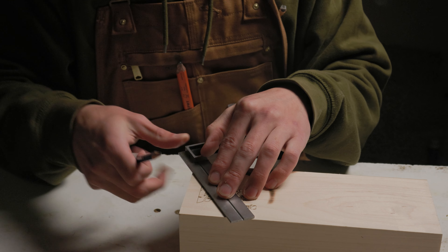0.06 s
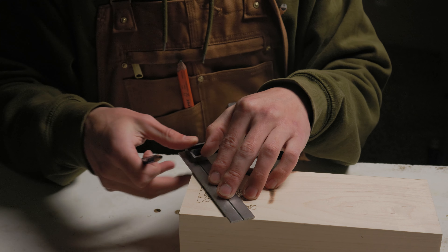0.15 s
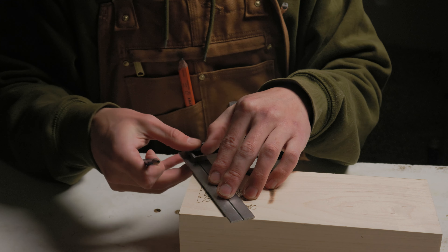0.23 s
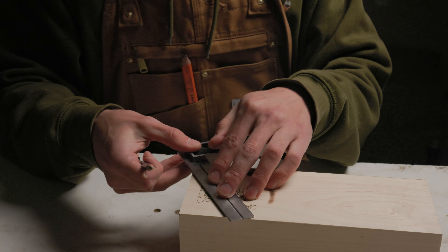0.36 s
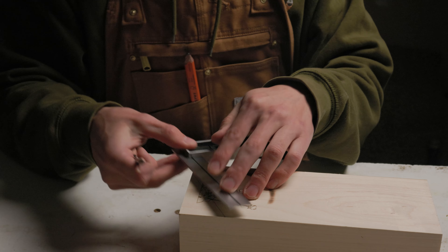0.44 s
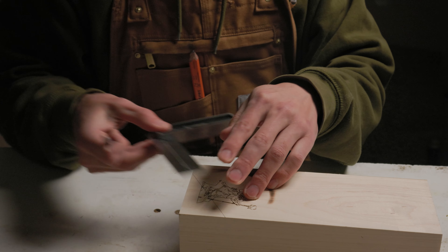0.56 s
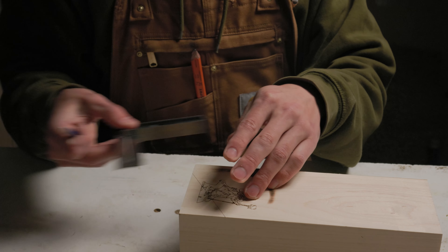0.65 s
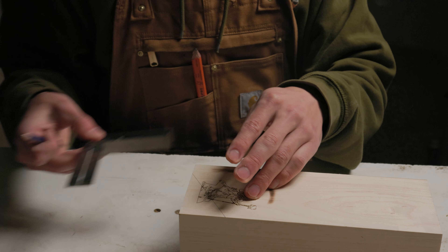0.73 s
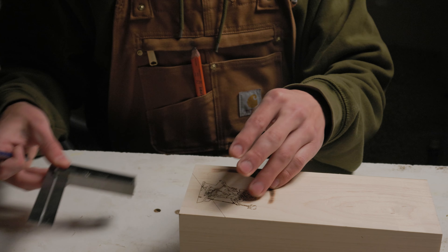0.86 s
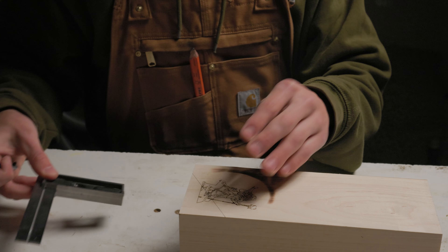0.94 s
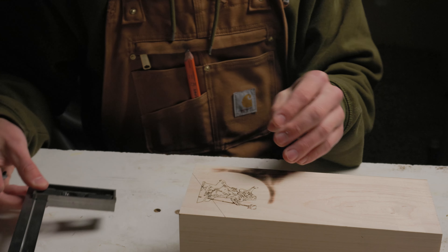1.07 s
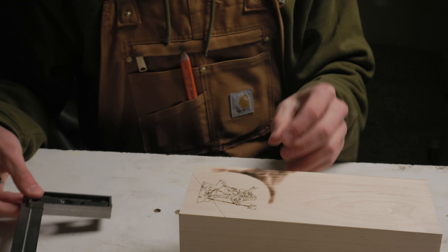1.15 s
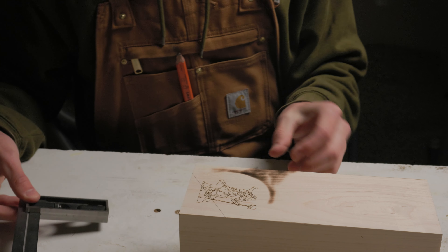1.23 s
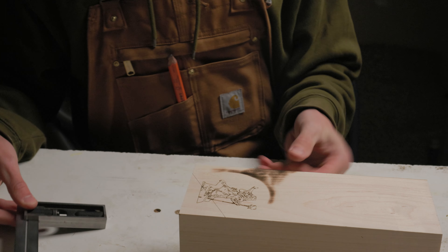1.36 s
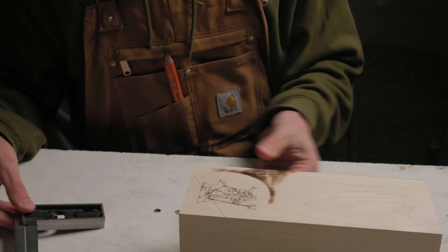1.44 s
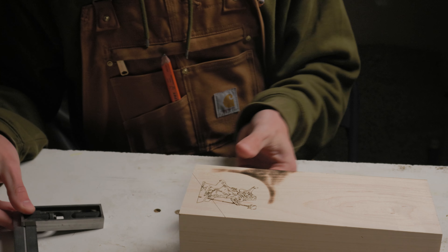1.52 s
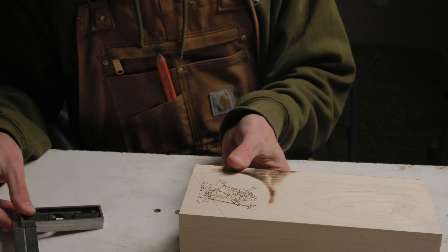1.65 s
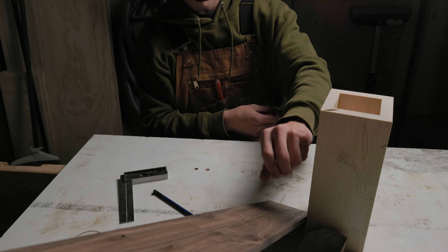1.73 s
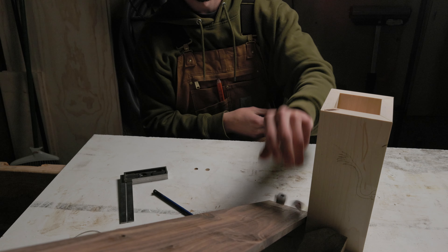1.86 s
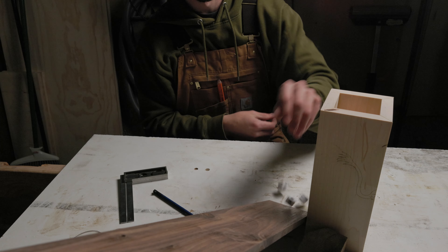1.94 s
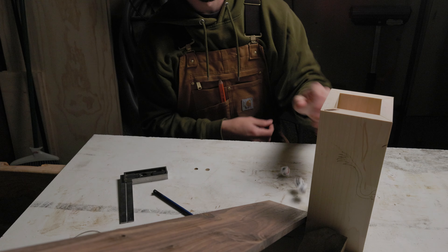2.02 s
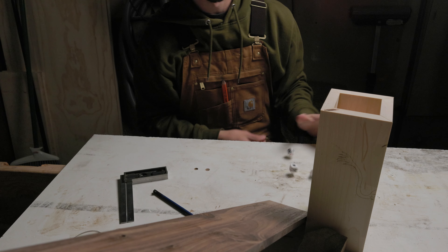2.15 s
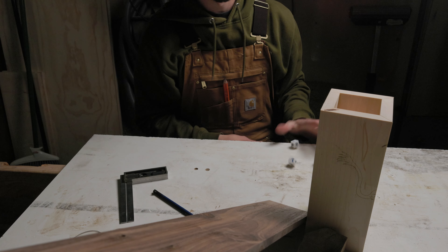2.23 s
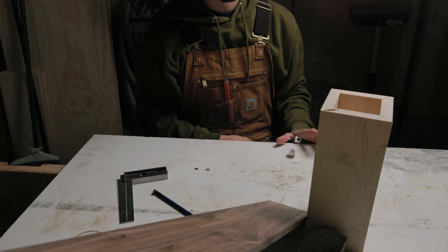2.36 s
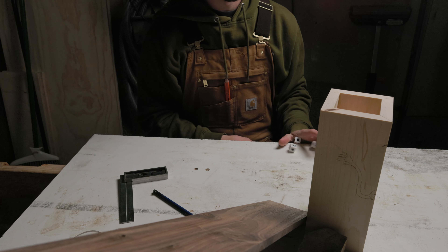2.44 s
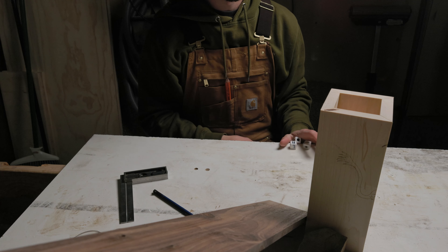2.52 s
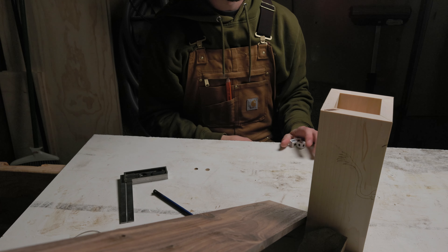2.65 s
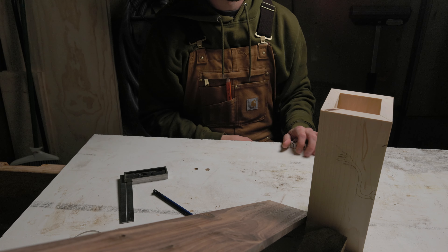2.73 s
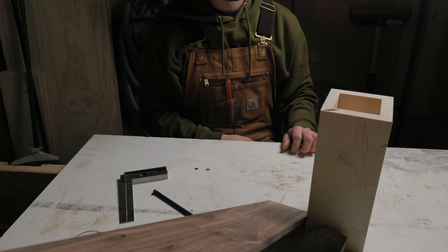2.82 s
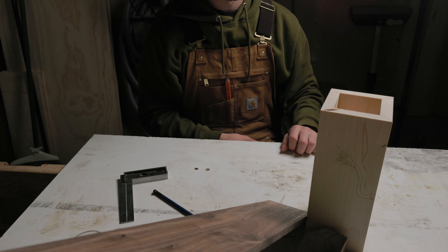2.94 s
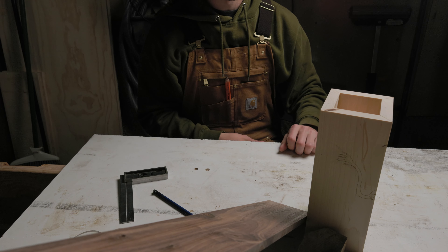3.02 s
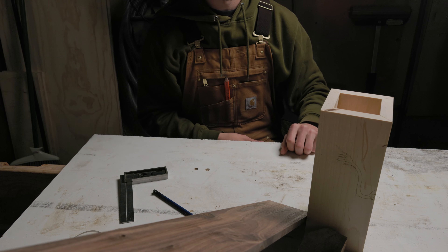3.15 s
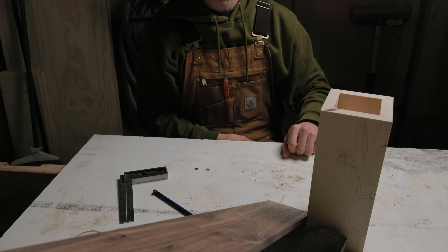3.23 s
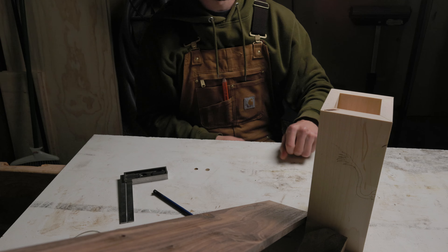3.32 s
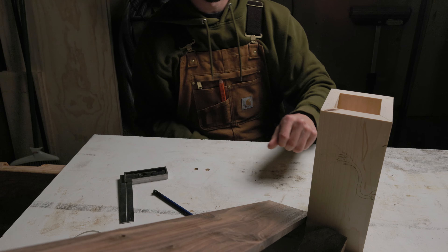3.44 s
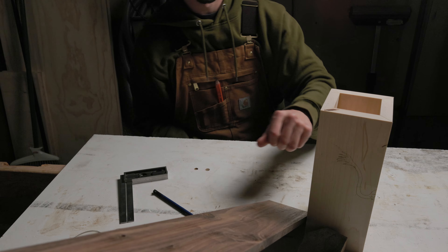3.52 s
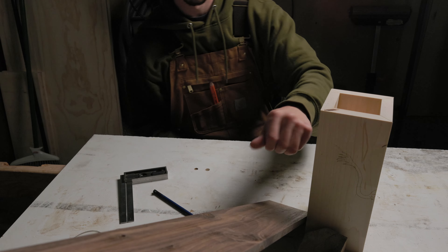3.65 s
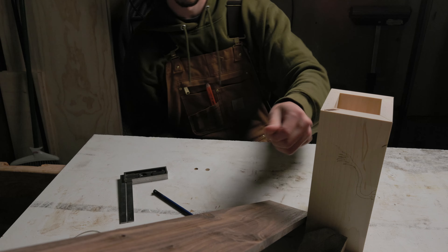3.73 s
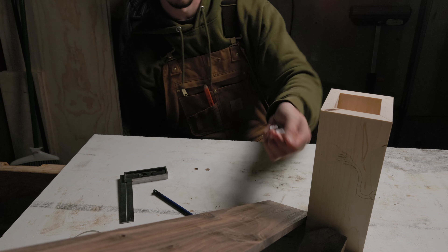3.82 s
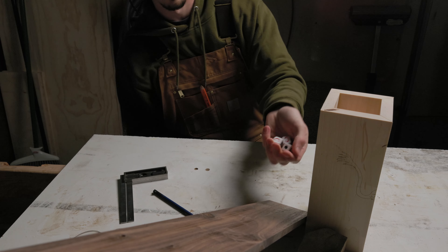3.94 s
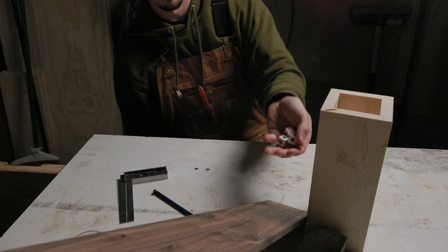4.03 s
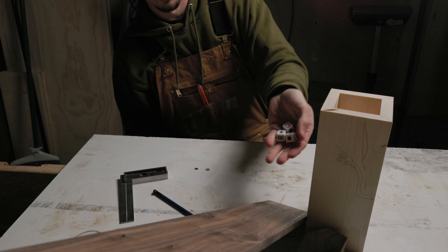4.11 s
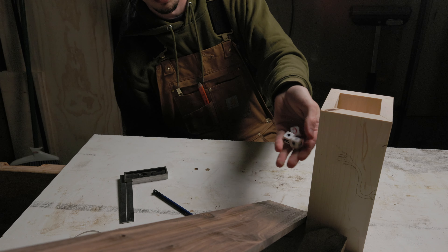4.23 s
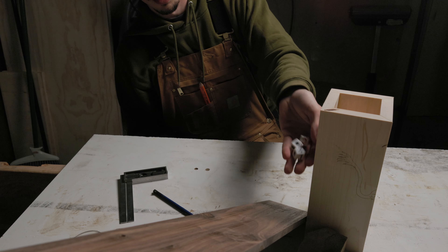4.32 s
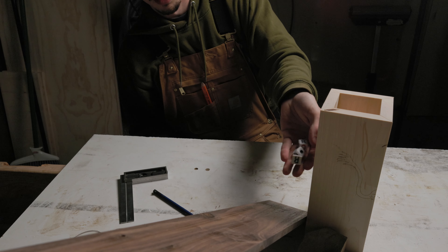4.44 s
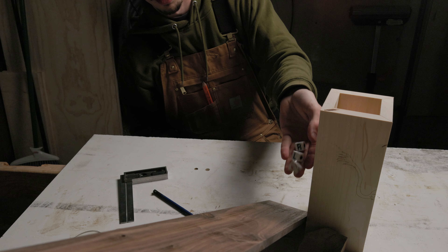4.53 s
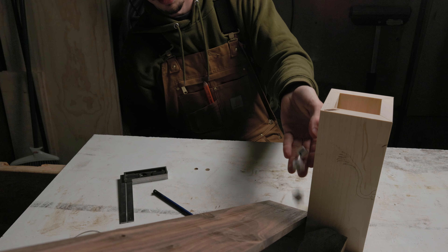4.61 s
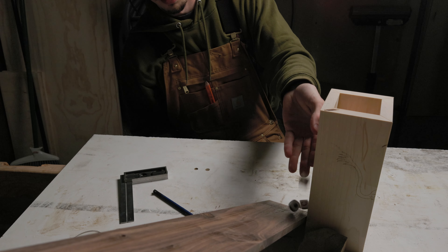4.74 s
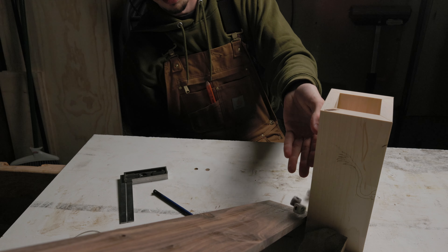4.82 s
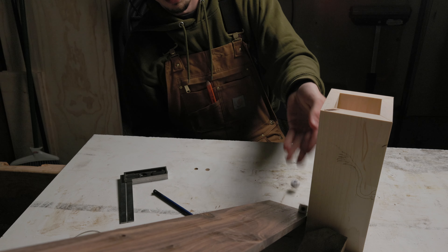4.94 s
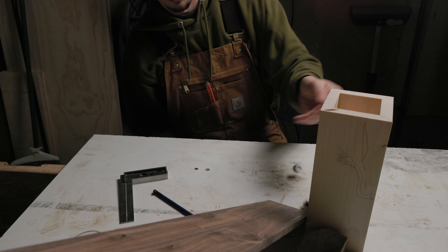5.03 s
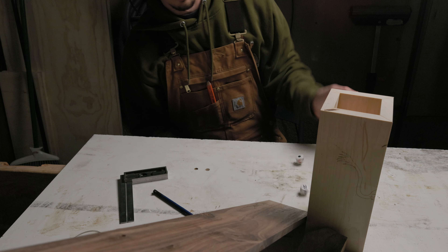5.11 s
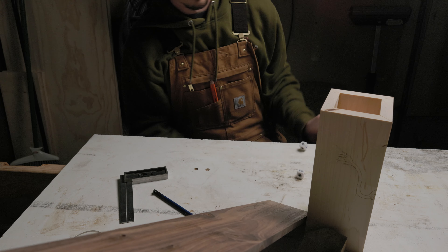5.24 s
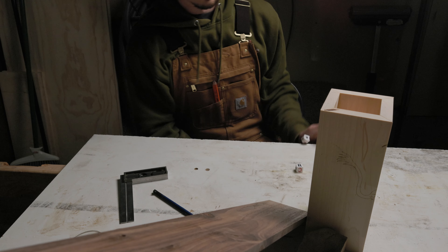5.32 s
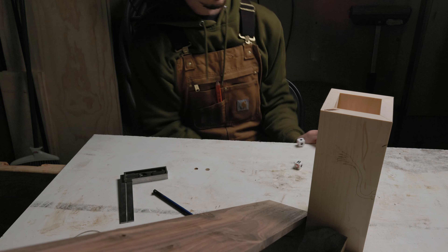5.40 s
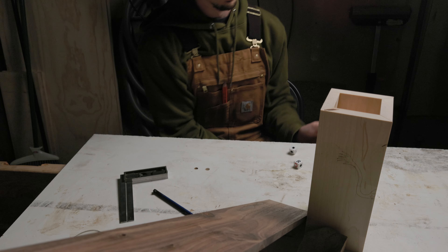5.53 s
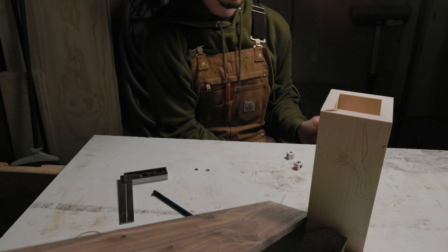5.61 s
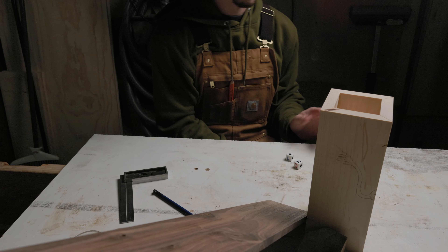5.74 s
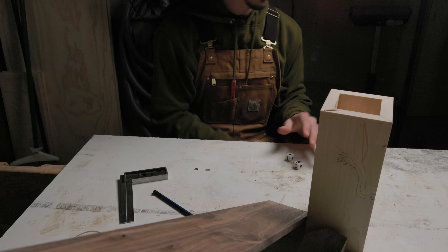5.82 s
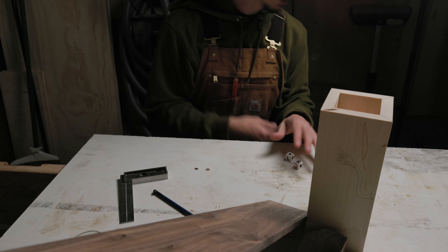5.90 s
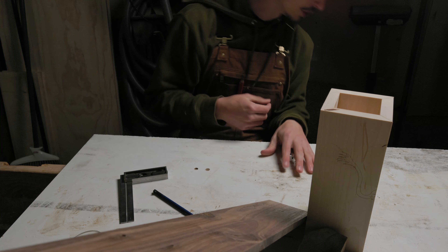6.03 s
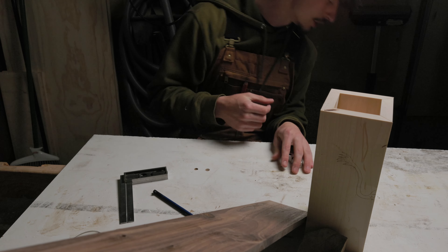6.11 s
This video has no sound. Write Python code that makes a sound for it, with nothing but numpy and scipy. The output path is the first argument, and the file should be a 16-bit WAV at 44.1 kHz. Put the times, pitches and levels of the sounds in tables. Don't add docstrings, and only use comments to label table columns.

```python
import sys
import numpy as np
from scipy import signal
from scipy.fft import rfft, irfft, next_fast_len
from scipy.io import wavfile

SR = 44100
rng = np.random.default_rng(int(sys.argv[2]) if len(sys.argv) > 2 else 0)


def unload_wav(signal):
    wavfile.write(
        sys.argv[1],
        SR,
        np.round(np.clip(np.atleast_2d(signal).T, -1, 1) * 32767).astype(np.int16),
    )


def boost_factor(decibels):
    exponent = np.asarray(decibels, float) / 20
    return 10 ** exponent


N = 272035

# start in seconds, peak in dB, table knock in
# dB, die click in dB, favoured pitch in Hz.
LANDINGS = [
    (1.9472, -3.5, -11.5, -41.5, 2900),
    (1.957, -2, -13.5, -38, 2527),
    (1.9684, -32, -17.5, -8.5, 1806),
    (1.9887, -11, -9, -24, 2430),
    (1.9932, -9.5, -20.5, -25, 3764),
    (2.0015, -8, -15, -24.5, 1840),
    (2.0195, -14.5, -12.5, -25, 1840),
            (4.7643, -3, -12, -22, 3100), (4.7898, -19.5, -8, -30.5, 3730),
                   (4.822, -41.5, -3, -1.5, 3710), (4.83, -7, -16.5, -17.5, 3230),
                   (4.8362, -15, -6, -7, 3039), (4.852, -3, -15, -30, 2800),
                   (4.8959, -10.5, -10.5, -24, 3400), (4.9073, -9, -13, -21, 3200),
                   (4.9196, -16.5, -8.5, -29.5, 3800), (4.9354, -8, -13, -30.5, 3270),
                   (4.9436, -9, -14, -14.5, 2080), (4.96, -16, -12, -16, 3160),
                   (4.984, -23.5, -8.5, -23, 2470)]
BOUNCES = [(2.0542, -21.5, -26, -5, 3210), (2.0596, -13, -10, -15, 3470),
           (2.064, -16, -15, -27, 2540), (2.1149, -18.5, -13, -12.5, 2800),
           (2.126, -21, -11, -31, 2800), (2.1329, -23.5, -4, -18, 2650),
           (2.1697, -22.5, -4.5, -3.5, 2830), (2.1755, -28, -21, -22, 2750),
           (2.2282, -23.5, -17, -1, 3750), (2.2348, -23, 0, -13, 2930), (2.2414, -19, -31, -11, 3240),
           (2.2538, -30, -22, -24, 2280), (2.2766, -33, -8, -20, 2750),
           (2.2986, -24.5, -4, -10, 3200), (2.3123, -27, -10, -20, 3100),
           (2.3191, -30, -17, -0.5, 2990), (2.3234, -22, -10, -28, 3100),
           (2.3279, -22, -23.5, -7.5, 3400), (2.3748, -24.5, -6, -16, 2870),
           (2.39, -22.5, -19, -12, 3200), (2.4241, -20, -20, -2.5, 3400),
           (2.481, -29.5, -16, -14, 2862), (2.503, -39, -9, -19, 2410), (2.536, -37, -15, -13, 2890),
                  (2.54, -28, -17, -15, 3360), (2.5683, -32, -13, -18, 3200), (2.5967, -37, 1, 4, 2890),
                  (2.6105, -28, -5.5, -4, 3180), (2.6398, -32.5, -0.5, -4, 2930),
                  (2.647, -35, -12, -6, 2750), (2.6529, -33.5, -3, -1.5, 2400),
                  (2.674, -34, -14, -15, 2480), (2.6803, -32, -7, -9, 2590), (2.6894, -38, 1, -6, 2260),
                  (2.704, -32.5, -1.5, -7, 2540), (2.7262, -36.5, 1.5, -6, 2580),
                  (2.7552, -43, -12, -5, 2360), (2.7896, -41, -11, -8, 2840), (2.7973, -44, -6, -2, 2880),
                  (2.8097, -36.5, -1, -8, 2360), (2.82, -41, -13, -4, 2390), (2.829, -41, -9, -7, 2680),
                  (2.837, -39, -1, -3, 2300),
           (5.0052, -17, -19, -2.5, 3100), (5.0111, -13.5, -20, -21, 2970),
                  (5.0826, -20.5, -11, -13.5, 3150), (5.0969, -18.5, -8, -22, 3699),
                  (5.1392, -22.5, -17, -18, 3230), (5.1462, -20.5, -10, -20, 3320),
                  (5.154, -23.5, -4, -21, 2300), (5.1765, -32, -14, -11, 2370),
                  (5.193, -16.5, -8, -3.5, 3261), (5.1976, -30, -5, -24, 2750),
                  (5.2105, -34, -10, -9, 3070), (5.2172, -26, -5, -21, 3240), (5.238, -23, -5.5, -19, 3330),
                  (5.2557, -25, -8, -15, 2960), (5.269, -28.5, -18, -8, 3170),
                  (5.3099, -17.5, -13.5, -16, 3330), (5.3235, -23.5, -13, -6, 3200),
                  (5.3327, -26, -13, -3.5, 3620),
           (5.3761, -36, 5, -10, 2800), (5.4053, -33, 0, -14, 2740), (5.4351, -27, 0, -18, 2800),
                   (5.5097, -28.5, 1, -17, 2800), (5.52, -29, 1, -17, 3030), (5.551, -37, 2, -30, 1980),
                   (5.5645, -38.5, 5.5, -7, 2990), (5.579, -35.5, 3, 2.5, 3420), (5.591, -32, -7, -7, 3140),
                   (5.598, -40, 7, -19, 2470), (5.604, -41, -11, -21, 1830), (5.6196, -36, -10, -23, 3210),
                   (5.6315, -44.5, -15, -25, 2760), (5.6488, -52, -14, -27, 2810),
                   (5.6595, -35, -19, -21, 3250), (5.6771, -31.5, -19, -4, 3480),
                   (5.681, -32, -15, -14, 3340), (5.7125, -35, -1, -9, 2220), (5.7203, -29, 3, -6.5, 2970),
                   (5.7728, -41, 4, -1, 1974),
           (2.2321, -18.5, -11, -30, 3080), (2.4352, -28.5, 0, -12, 2800), (2.63, -41, -7, -10, 2600),
                 (2.6709, -32, -5, -15, 2500), (2.747, -45.5, 5, -20, 2300), (2.7844, -58, -12, -5, 2800),
                 (2.846, -38.5, 4.5, -20, 2990), (5.0027, -22, -16, -18, 3200), (5.033, -35, -3, 1, 2902),
                 (5.044, -32, -15, -8, 2570), (5.13, -30, -13, -18, 2610), (5.26, -34, -6, -10, 2420),
                 (5.361, -40, -4, -13, 2300), (5.456, -34, -1, -24, 1989), (5.527, -34, 0, -31, 2201),
                 (5.7412, -33, 9, -27, 2220), (5.757, -31, 3, -35, 1500), (5.707, -36.5, 8, -35, 1300)]
# pitch in Hz, level in dB, t60 in seconds.
BOARD_MODES = [(1577, -12, 0.053), (1840, -0.5, 0.079), (2000, -6.5, 0.067), (2180, -18.5, .05),
               (2300, -15.5, 0.0402), (2453, 2.5, 0.037), (2800, -12.5, 0.022), (3160, -0.5, 0.03),
               (3200, -6.5, 0.02), (3770, 1.5, 0.05), (4282, -9.5, 0.051), (4800, -12, 0.05),
               (5350, -12, 0.049), (6000, -25, 0.028)]
# pitch in Hz, level in dB, t60 in seconds.
TABLE_MODES = [(165, -8.5, 0.092), (198, -12.5, 0.17), (375, -10, 0.085), (392.3, -24, 0.082),
               (558.7, -9.5, 0.042), (642, -6.5, 0.11), (785, -11, 0.14), (1002, 2.5, 0.084),
               (1136, 8.5, 0.03), (1298, 0.5, 0.048), (1430, -4.5, 0.06)]
# start in seconds, end in seconds, first level in dB, fade in dB per second.
ROLLS = [
    (2.08, 2.414, -45.5, 4),
    (2.423, 2.849, -49.5, 6.5),
    (4.993, 5.303, -47.5, -5),
    (5.305, 5.43, -46, 17),
    (5.494, 5.847, -50, 20),
]
# frequency in Hz, density in dB per Hz.
ROLLING_COLOUR = [(71, -47), (150, -12), (500, -1.5), (1000, 2.5), (2300, 0.5), (3800, -0.5), (5000, -12),
                  (8000, -33), (11000, -47), (14500, -75)]
# start in seconds, peak in dB, pitch in
# Hz.
DICE_TICKS = [
    (2.975, -73, 7980),
    (3.048, -62, 9000),
    (3.048, -52.5, 2800),
    (3.053, -64, 6500),
    (3.0532, -68, 9800),
    (3.056, -57, 2600),
    (3.061, -64, 3600),
              (3.992, -46, 6400), (3.9924, -48, 9000), (3.9926, -52, 12500), (4.038, -56, 5550),
              (4.059, -63, 5700), (4.1037, -48, 6300), (4.107, -62, 4950), (4.113, -60, 4000),
              (4.128, -58, 4500), (4.142, -58, 4300), (4.151, -59, 5000), (4.1815, -72, 10500),
              (4.219, -69, 7500), (4.349, -51, 5400), (4.358, -74, 9030), (4.368, -53, 5370),
              (4.384, -61, 5400), (4.448, -55, 5200), (4.475, -62, 6000), (4.494, -59.5, 4970),
              (4.502, -62, 4900), (4.529, -56.5, 5370), (4.538, -61.5, 5500), (4.655, -48.5, 5740),
              (4.728, -54.5, 6502),
              (6.0345, -54, 3104),
    (6.0469, -57, 4600),
    (6.0483, -47.5, 4200),
    (6.0495, -52, 6500),
]
# start in seconds, peak in dB, pitch in Hz.
CORNER_CLASHES = [(1.9684, -50, 9970), (1.9874, -50, 11620), (2.0543, -44, 13400), (2.0586, -45, 10100),
                  (2.1254, -58, 10500), (2.1685, -54, 9880), (2.2273, -48, 10200), (2.2414, -53, 11600),
                  (2.2977, -58, 12200), (2.3114, -54, 9880), (2.3224, -56, 9950), (2.3266, -47, 9960),
                  (2.3895, -49, 11600), (2.4014, -64, 11800), (2.4234, -42, 10500), (2.5346, -61, 9900),
                  (2.5424, -77, 9970), (2.5671, -65, 9870), (2.596, -55, 10800), (2.6095, -54, 10300),
                  (2.6389, -61, 9800), (2.6693, -60, 10700), (2.7028, -58, 9800), (2.7636, -72, 11900),
                  (2.7834, -67, 9980), (2.7896, -57, 11600), (2.821, -60, 9910), (2.837, -58, 9800),
                  (4.7636, -46, 10500), (4.8294, -50, 11500), (4.8349, -41, 10500), (4.9424, -46, 10100),
                  (5.0047, -43, 10500), (5.1382, -58, 10450), (5.1922, -46, 10500), (5.237, -62, 10300),
                  (5.3088, -52, 10700), (5.3224, -55, 13600), (5.3323, -45, 9800), (5.4064, -70, 12200),
                  (5.434, -63, 9920), (5.5783, -63, 9890), (5.6755, -51, 10500), (5.7194, -56, 10400)]
# start in seconds, peak in
# dB, pitch in Hz, t60 in seconds.
HOLLOW_NUDGES = [
    (4.2, -58, 3900, .02),
    (4.002, -57, 4200, .025),
    (4.007, -54, 3800, .025),
    (4.011, -59, 4500, 0.022),
    (4.386, -66, 3860, .015),
    (4.017, -63, 4200, .02),
    (6.135, -56, 2560, 0.05),
    (6.156, -55, 2450, 0.03),
    (6.163, -56, 2560, 0.0301),
    (6.148, -52, 185, 0.22),
]
# start in seconds, peak in dB.
SQUARE_TOUCH = [
    (1.4484, -27.5),
]
# pitch in Hz, level in dB, t60 in seconds.
STEEL_MODES = [(2783, -4, .05), (3155, -5, .08), (4885, -4, .15), (5750, 1, .11), (7012, 2, .2),
               (7490, -11, .1), (8430, 1, .03), (9620, -3, .08), (10405, -10, .22), (11045, -6, .05),
               (12080, -6, .1), (12700, -8, .11), (13850, -12, .06), (14850, -12, .06)]
# frequency in Hz, density in dB per Hz.
THUD_COLOUR = [(71, -35), (120, -18), (321, -6), (693, -2), (980, -8), (1080, -0.5), (1600, -9),
               (3000, -21), (7270, -52), (12000, -52), (15600, -69), (22000, -120)]
# start in seconds, top in seconds, level in dB.
WOOD_DRAGS = [
    (5.696, 5.715, -36),
]
# pitch in Hz, width in Hz, level in dB.
WOOD_RESONANCES = [(290, 240, -7), (496, 61, 2), (1005, 230, -2.5), (1422, 25, -5), (1630, 35, -13)]
# start in seconds, top in seconds, level in dB.
PALM_SLIDES = [
    (3.046, 3.047, -77.5),
    (3.991, 3.992, -70),
    (4.1, 4.134, -74.5),
    (5.77, 5.771, -54.5),
    (6.031, 6.04, -53),
]
# frequency in Hz, density in dB per Hz.
SKIN_COLOUR = [(1180, -17), (2600, -10), (3200, 0), (8040, -5.5), (11500, -21.5), (14100, -32),
               (15000, -50)]
# time in seconds, level in dB.
TABLE_SWAYS = [
    (1.5, -74),
    (2.0, -73.5),
    (2.47, -61.5),
    (2.7, -66),
    (4.1, -83),
    (4.8, -84),
    (5.201, -68),
    (5.58, -63),
    (6.12, -74),
]
# frequency in Hz, t60 in seconds.
SHOP_T60 = [(150, 0.97), (1000, 0.36), (4000, 0.33), (12000, 0.33), (14500, .22)]
# frequency in Hz, density in dB per Hz.
ROOM_COLOUR = [(12, -52), (20, -10.5), (125, -4.5), (351, -10.5), (383, -9.5), (497, -10.5), (718, -10),
               (1000, -10.5), (1300, -19.5), (1690, -50), (2860, -120)]
# frequency in Hz, density in dB per Hz.
HISS_COLOUR = [(900, -40), (1300, -2), (2000, -5.5), (4000, -12.5), (6500, -27.5), (9600, -34),
               (10100, -58.5), (15500, -71)]
# pitch in Hz, width in Hz, rms level in dB.
FAN_LINES = [(123.35, 11, -73.5), (499, 9.2, -79), (960, 120, -82.5), (1007, 22, -89.5)]
# time in seconds, gain in dB.
WHINE_SWELL = [(0, -1.5), (2, 2), (4, 3.5), (6.17, -1.5)]
# pitch in Hz, rms level in dB.
MOTOR_WHINE = (974.4, -73.5)


def unit(x):
    return x / np.sqrt(np.mean(x ** 2) + 1e-20)


def along(points, hz):
    f, value = np.transpose(points)
    return np.interp(np.log(hz + 1), np.log(f + 1), value)


def filtered(x, response):
    size = next_fast_len(x.shape[-1] + 2048)
    spectrum = rfft(x, size) * response(np.fft.rfftfreq(size, 1 / SR))
    return irfft(spectrum, size)[..., :x.shape[-1]]


def peak(f, hz, width_hz):
    return 1j * f * width_hz / (hz * hz - f * f + 1j * f * width_hz + 1e-9)


def hiss(colour, grit_db=0):
    grit = np.repeat(rng.standard_normal(N // 40 + 1), 40)[:N]
    grains = rng.standard_normal(N) * boost_factor(grit_db * grit)
    return unit(filtered(grains, lambda f: boost_factor(along(colour, f))))


def stroke(start, top, end, db, fade, t60):
    t = np.arange(N) / SR
    rise = np.clip((t - start) / (top - start), 0, 1) ** 2
    fade_db = fade * np.clip(t - top, 0, end - top)
    tail_db = 60 * np.clip(t - end, 0, 9) / t60
    return rise * boost_factor(db - fade_db - tail_db)


def lay(times, rows):
    index = np.round(np.asarray(times) * SR).astype(int)[:, None] + np.arange(rows.shape[1])
    return np.bincount(index.ravel(), rows.ravel(), N + SR)[:N]


def ring(modes, favoured_hz, lean_db, scatter_db, damping=1, contact=0.000435, detune=0.0078,
         beat=0.5, beat_hz=70, size=SR // 11):
    t = np.arange(size) / SR
    hz, db, t60 = np.transpose(modes)[:, None, :, None]
    chance = rng.standard_normal((len(favoured_hz), len(modes), 5))
    octaves_off = np.abs(np.log2(hz / favoured_hz[..., None]))
    start_db = db + scatter_db * chance[..., :1] - lean_db * octaves_off
    pitch = hz * (1 + detune * chance[..., 1:2])
    swing = np.cos(2 * np.pi * pitch * (t - contact) + 0.17 * chance[..., 2:3])
    swing = swing * (1 - beat * np.sin(np.pi * beat_hz * (1 + 0.43 * chance[..., 3:4]) * t) ** 2)
    rows = np.sum(boost_factor(start_db - 60 * damping * t / t60) * swing, axis=1)
    rows = rows * np.sin(np.pi / 2 * np.clip(t / (1.92 * contact), 0, 1)) ** 2
    return rows / np.abs(rows).max(axis=1, keepdims=True)


def crack(hz, breadth, t60, snap, top_hz, size=SR // 11):
    t = np.arange(SR // 16) / SR
    burst = (rng.standard_normal((len(hz), len(t))) + snap * (t == 0)) * boost_factor(-60 * t / t60)
    rows = filtered(burst, lambda f: peak(f, hz, breadth * hz) ** 2 / (1 + 1j * f / top_hz) ** 4)
    rows = np.pad(rows, ((0, 0), (0, size - len(t))))
    return rows / np.abs(rows).max(axis=1, keepdims=True)


def blows(events, board_share, scatter_db, crack_t60, snap, damping, knock_gain_db, click_gain_db, click_t60):
    s, db, knock_db, click_db, hz = np.transpose(events)[..., None]
    board = ring(BOARD_MODES, hz, lean_db=8.5, scatter_db=scatter_db, damping=damping)
    wood_crack = crack(hz, 0.73, crack_t60, snap=snap, top_hz=5700)
    body = board_share * board + (1 - board_share) * wood_crack
    table = ring(TABLE_MODES, hz, lean_db=0, scatter_db=5.0, damping=damping, contact=0.00153)
    knock = boost_factor(knock_db + knock_gain_db) * table
    click = boost_factor(click_db + click_gain_db) * crack(5500 + 0 * hz, 0.9, click_t60, snap=5, top_hz=5700)
    return lay(s[:, 0], boost_factor(db) * (body + knock + click))


def rattle_gain(events):
    s, db = np.transpose(events)[:2, :, None]
    t = np.arange(SR // 5) / SR
    chatter = boost_factor(db - 20.5 - 60 * t / 0.18) * np.clip(t / 0.0019, 0, 1)
    return np.sqrt(lay(s[:, 0], chatter ** 2))


def dice():
    landings = blows(LANDINGS, board_share=0.63, scatter_db=2.5, crack_t60=0.019,
                     snap=5.1, damping=1.55, knock_gain_db=0.1, click_gain_db=4.5, click_t60=0.037)
    contacts = BOUNCES
    bounces = blows(contacts, board_share=0.14, scatter_db=11, crack_t60=0.011,
                    snap=6.4, damping=3.9, knock_gain_db=-2.5, click_gain_db=3.0, click_t60=0.01)
    rolling = sum(stroke(s, s + 0.03, end, db, fade, t60=0.3) for s, end, db, fade in ROLLS)
    grain = np.hypot(rolling, rattle_gain(contacts)) * hiss(ROLLING_COLOUR, grit_db=2.5)
    return -landings - boost_factor(0.04) * bounces + grain


def ticks():
    s, db, hz = np.transpose(DICE_TICKS)[..., None]
    return lay(s[:, 0], boost_factor(db + 3.0) * crack(hz, 0.55, 0.0057, snap=4.3, top_hz=hz))


def clashes():
    s, db, hz = np.transpose(CORNER_CLASHES)[..., None]
    return lay(s[:, 0], boost_factor(db - 0.5) * crack(hz, 0.35, 0.005, snap=4, top_hz=2.5 * hz))


def nudges():
    s, db, hz, t60 = np.transpose(HOLLOW_NUDGES)[..., None]
    t = np.arange(SR // 8) / SR
    onset = 1 - np.exp(-t / 0.0011)
    return lay(s[:, 0], boost_factor(db - 60 * t / t60) * np.sin(2 * np.pi * hz * t) * onset)


def square():
    s, db = np.transpose(SQUARE_TOUCH)[..., None]
    t = np.arange(SR // 4) / SR
    thud = hiss(THUD_COLOUR, grit_db=-5.0)[:len(t)] * boost_factor(-9.5 - 60 * t / 0.25)
    song = boost_factor(-11) * ring(STEEL_MODES, s, lean_db=0, scatter_db=0, contact=0.0001, detune=0,
                           beat=0.2, beat_hz=30, size=len(t))
    tap = boost_factor(-2) * crack(4000 + 0 * s, 2.5, 0.012, snap=2, top_hz=14000, size=len(t))
    jangle = unit(filtered(rng.standard_normal(len(t)), lambda f: peak(f, 8000, 2500) ** 2))
    jangle = jangle * boost_factor(-38 - 60 * t / 0.22)
    return lay(s[:, 0], boost_factor(db) * (song + tap + thud + jangle))


def wood_drag():
    def wood(f):
        return sum((-1) ** k * boost_factor(db) * peak(f, hz, width)
                   for k, (hz, width, db) in enumerate(WOOD_RESONANCES))

    slips = hiss([(100, -30), (250, -12.5), (2000, -6.5), (6000, -15), (15000, -58)], grit_db=1)
    pull = sum(stroke(s, top, top + 0.02, db, fade=0, t60=0.32) for s, top, db in WOOD_DRAGS)
    return pull * unit(filtered(slips, wood))


def palm_slide():
    slide = sum(stroke(s, top, top + 0.01, db, fade=0, t60=0.3) for s, top, db in PALM_SLIDES)
    return slide * hiss(SKIN_COLOUR, grit_db=2.0)


def table_sway():
    t = np.arange(N) / SR
    sway = hiss([(12, -33.0), (25, -2.0), (50, -5.0), (90, -30), (200, -42), (500, -120)])
    lean = boost_factor(-91.5) + sum(boost_factor(db) * np.exp(-np.abs(t - s) / 0.08) for s, db in TABLE_SWAYS)
    return lean * sway


def shop(x):
    step = SR // 20
    wet = np.zeros(N + SR)
    fade = np.sin(np.pi * np.arange(2 * step) / (2 * step))
    for start in range(0, N - step, step):
        part = x[start:start + 2 * step]
        if np.abs(part).max() > 1e-5:
            hz, t, z = signal.stft(rng.standard_normal(SR // 2), SR, nperseg=256)
            dying = z * boost_factor(-60 * t / along(SHOP_T60, hz)[:, None])
            tail = signal.istft(dying, SR, nperseg=256)[1][:SR // 2]
            echo = signal.fftconvolve(part * fade[:len(part)], tail / np.linalg.norm(tail))
            wet[start + 130:][:len(echo)] += echo
    return filtered(wet[:N], lambda f: 1 / (1 + (f / 14300) ** 14))


def fan():
    lines = sum(boost_factor(db) * unit(filtered(rng.standard_normal(N), lambda f: peak(f, hz, width) ** 2))
                for hz, width, db in FAN_LINES)
    t = np.arange(N) / SR
    whine_hz, whine_db = MOTOR_WHINE
    whine = boost_factor(whine_db) * unit(np.sin(2 * np.pi * whine_hz * t))
    swell = boost_factor(np.interp(t, *np.transpose(WHINE_SWELL), left=-150, right=-150))
    return lines + swell * whine


def air():
    return boost_factor(-66) * hiss(ROOM_COLOUR) + boost_factor(-74) * hiss(HISS_COLOUR)


def scene():
    wooden = dice() + square() + wood_drag() + palm_slide()
    near = filtered(wooden, lambda f: (1j * f / (1j * f + 90)) ** 3)
    plastic = ticks() + clashes() + nudges()
    room = shop(boost_factor(-9.0) * near + boost_factor(-8.5) * plastic)
    return (near + plastic + room + table_sway() + fan() + air())[None]


def roll_off(x):
    return signal.sosfilt(signal.butter(12, 15710, fs=SR, output="sos"), x)


def record(dry):
    mix = filtered(dry, lambda f: (f < 15700) / (1 + (f / 15200) ** 16))
    return roll_off(mix)


dry = scene()
out = record(dry)
unload_wav(out)
```